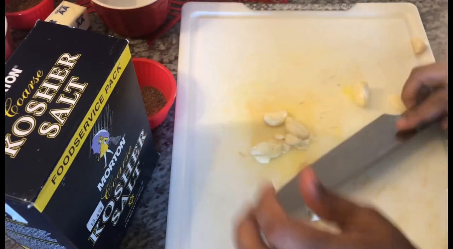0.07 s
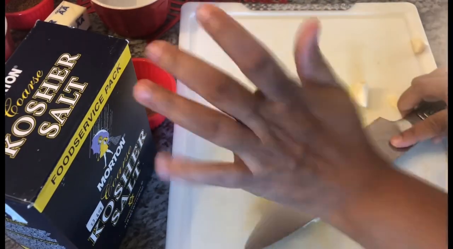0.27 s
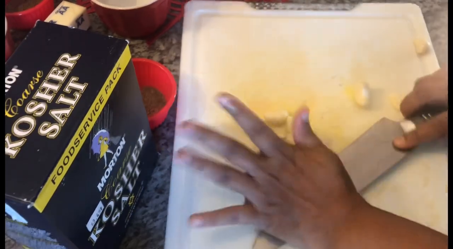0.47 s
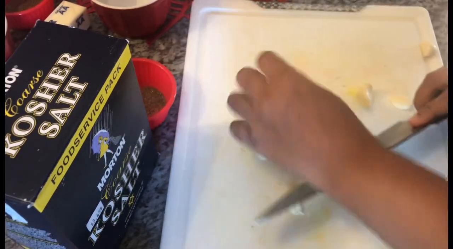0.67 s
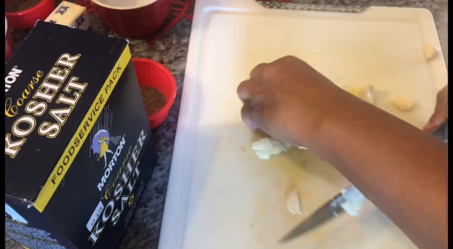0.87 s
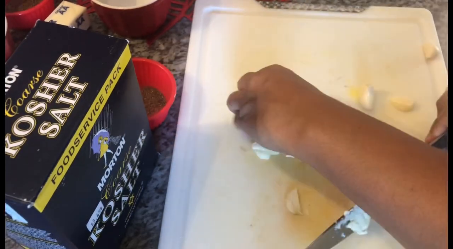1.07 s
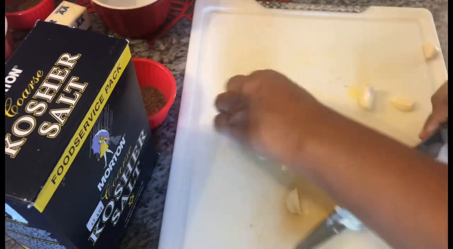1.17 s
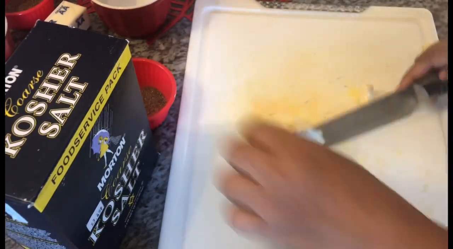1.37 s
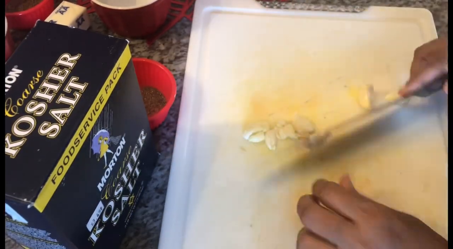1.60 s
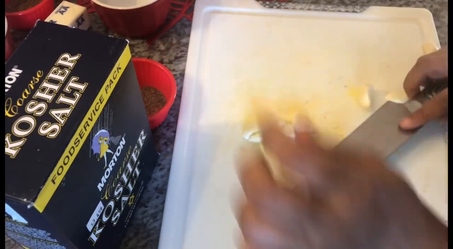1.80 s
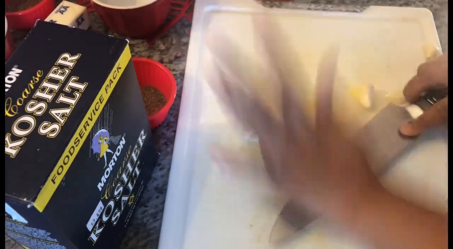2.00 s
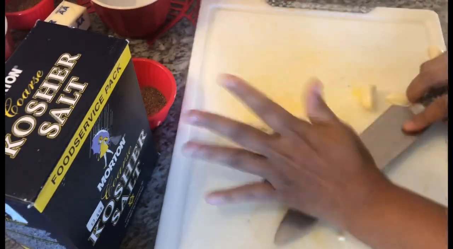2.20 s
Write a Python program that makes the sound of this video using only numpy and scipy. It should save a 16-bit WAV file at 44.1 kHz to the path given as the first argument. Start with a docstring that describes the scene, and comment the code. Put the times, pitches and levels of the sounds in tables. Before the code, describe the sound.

Two loud slaps on a knife blade crush garlic against a cutting board, each with a low thud. Between them come light knocks and a rasping, ringing scrape of steel, close by in a small, faintly humming kitchen.

```python
"""Two loud slaps, each with a boom: a palm hits the flat of a chef's knife to crush garlic on a plastic
board, and the counter shakes underneath. In between, the blade knocks on the board and is scraped clean,
rasping, then hissing and ringing as it comes free. Dry garlic skin ticks faintly.
The small kitchen echoes and has a low hum; a limiter (a fast volume control) squashes both slaps."""
import sys
import numpy as np
from scipy import signal
from scipy.fft import rfft, irfft
from scipy.io import wavfile
from scipy.ndimage import uniform_filter1d, minimum_filter1d

SR = 44100
rng = np.random.default_rng(int(sys.argv[2]) if len(sys.argv) > 2 else 0)


def bounce(signal):
    """Save signal as a 16-bit WAV file at the path given by the first command-line argument."""
    frames = np.transpose(np.atleast_2d(signal))
    limited = np.clip(frames, -1, 1)
    pcm = np.round(limited * 32767).astype(np.int16)
    wavfile.write(sys.argv[1], SR, pcm)


N = 99225
T = np.arange(N) / SR
SHORT = T[:8192]  # time axis for brief sounds
IMPULSE = SHORT == 0  # one instant push


def slaps():
    """Palm, blade and clove collide several times within each slap."""
    # the collisions (time [s], level [dB], brightness [Hz], fade time [s], board ring [Hz])
    hits = [(.2286, -20.5, 8970, 0.0034, 1027), (.2299, -8.5, 9500, 0.014, 1074),
            (.2320, -5.5, 4500, 0.017, 1480), (.2339, 6, 4800, 0.013, 1080), (.2373, 1, 2200, 0.011, 1250),
            (.2505, -14, 1840, .008, 1078), (1.9144, -22.5, 7700, 0.016, 1240),
            (1.9158, -4, 7330, 0.011, 1148), (1.9186, -9, 2340, 0.004, 1128),
            (1.9199, -8.5, 7510, 0.0083, 1179)]
    # tone of the crack (frequency [Hz], level [dB])
    colour = [(60, -40), (300, -15.5), (700, -13), (1200, -1), (2200, -1.5), (3200, -1), (5200, 0.5),
              (7000, -5), (9500, -1), (15500, 1.5)]
    return blows(hits, colour, ring_db=-7, ring_t60=0.027, grit=3.6)


def thuds():
    """The weight of the hand lands: the counter booms and the board shudders on it."""
    # the landings (time [s], level [dB])
    landings = [(.234, -31.5), (0.2488, -20.5), (1.921, -45), (1.931, -24.5)]
    # the counter's own notes (pitch [Hz], level [dB], fade time [s])
    counter_modes = [(56.6, -17, .4), (96, -0.5, 0.25), (118.6, -7, 0.29), (145.7, -5.5, 0.16),
                     (213.2, -14, 0.34), (265, -12.5, 0.1), (381, -21, 0.22), (475, -15, 0.3),
                     (620, -11.5, .3)]
    # tone of the shuddering board (frequency [Hz], level [dB])
    rattle_colour = [(30, -14.5), (90, 10), (200, -8.5), (400, -4.5), (700, -4), (1500, -36), (5000, -60)]
    push_s, rattle_db = .0015, -4
    notes = sum(amp(db) * mode(hz, t60, T) for hz, db, t60 in counter_modes)
    boom = soften(notes, 1 / push_s)  # a slower push gives a duller boom
    out = np.zeros(N)
    for s, db in landings:
        shudder = through(noise(), body(rattle_colour)) * fade(t60=.28)
        add(out, s, amp(db) * (boom + amp(rattle_db) * shudder))
    return thin(out, 32)


def knocks():
    """Knife and fingers knock lightly on the board."""
    # the knocks (time [s], level [dB], brightness [Hz], fade time [s], board ring [Hz])
    hits = [(.8612, -34.5, 890, 0.013, 620), (.864, -32, 350, .012, 316), (.9706, -10, 1820, .004, 1158),
            (.9722, -30, 600, 0.0054, 780), (.9742, -20.5, 1310, .004, 1070),
            (1.4222, -26.5, 2200, .004, 1120), (1.4238, -37, 1987, .004, 1780),
            (1.4255, -41, 2500, .004, 1130)]
    # tone of a knock (frequency [Hz], level [dB])
    colour = [(60, -60), (200, -30), (350, -1.5), (700, 6), (1200, 15.5), (1700, 13), (2000, 7), (3400, 8),
              (4500, -16), (15000, -11)]
    return blows(hits, colour, ring_db=4, ring_t60=0.035, grit=0.91)


def blows(hits, colour, ring_db, ring_t60, grit):
    """Each hit is a push and a gritty burst with its own brightness; the board rings briefly."""
    out, response = np.zeros(N), body(colour)
    strength = np.sqrt(.002 * SR)  # at 0 dB: the energy of 2 ms at full level
    for s, db, bright_hz, t60, ring_hz in hits:
        contact = soften(through(IMPULSE + grit * burst(t60), response), bright_hz)
        ring = soften(mode(ring_hz, ring_t60), 2 * ring_hz)
        ring = unit(thin(ring, ring_hz / 2))
        add(out, s, amp(db) * strength * unit(unit(contact) + amp(ring_db) * ring))
    return out


def burst(t60):
    """A crush of tiny contacts that dies away, equally strong from low to high."""
    spectrum = rfft(rng.standard_normal(len(SHORT)) * fade(t60, SHORT))
    even = spectrum / np.sqrt(uniform_filter1d(np.abs(spectrum) ** 2, size=100))
    return unit(irfft(even) * fade(4 * t60, SHORT))


def scrape():
    """Many tiny, uneven slips rasp on the board, then brighten and set the steel ringing."""
    # the stroke (time [s], board level [dB], blade level [dB], brightness [Hz])
    stroke = [(.985, -92, -68, 4000), (1.022, -52, -58, 9550), (1.04, -44, -57.5, 5000),
              (1.096, -32.5, -34.5, 4340), (1.148, -30, -24.5, 7560), (1.17, -34.5, -31.5, 9600),
              (1.205, -40, -30.5, 8300), (1.254, -69, -36, 10000), (1.298, -49, -48.5, 9700),
              (1.341, -80, -59, 8000)]
    # tone of the board's rasp (frequency [Hz], level [dB])
    rasp_colour = [(100, -37), (450, -27.5), (620, -5.5), (800, -11), (1000, -7.5), (1150, 6.5), (1400, -5),
                   (2200, -6.5), (4000, -21), (12000, -32)]
    # tone of the blade's hiss (frequency [Hz], level [dB])
    hiss_colour = [(300, -24), (700, -21), (1200, -13), (2200, 3), (2700, -3), (3300, 1.5), (4100, -6.5),
                   (5000, 3), (6700, -5.5), (8500, -6), (12000, -2.5), (15500, -2.5)]
    slips_per_s, spread_db, chatter_db = 2500, 2.5, 1
    times, board_db, blade_db, bright_hz = np.array(stroke).T
    board_level = amp(np.interp(T, times, board_db, left=-120, right=-120))
    blade_level = amp(np.interp(T, times, blade_db, left=-120, right=-120))
    sizes = amp(spread_db * np.minimum(rng.exponential(size=N), 5))
    slipping = rng.random(N) < slips_per_s / SR
    slips = unit(slipping * sizes * np.sign(noise())) * np.sqrt(N)
    chatter = amp(chatter_db * wander(per_s=300))  # the edge catches and lets go
    slips = thin(slips * chatter, 360)
    # blend from each row's brightness into the next
    blends = (np.interp(T, times, row) for row in np.eye(len(times)))
    edge = blade_level * sum(blend * soften(slips, hz) for blend, hz in zip(blends, bright_hz))
    hiss_response = unit(through(body(hiss_colour), IMPULSE + 1.06 * fine_modes(count=90)))
    rasp = through(slips * board_level, body(rasp_colour))
    hiss = through(edge, hiss_response)
    return rasp + amp(0.5) * hiss + amp(-0.5) * blade_ring(edge)


def blade_ring(drive):
    """Each note of the blade swells and fades as the contact moves along the edge."""
    # the blade's own notes (pitch [Hz], level [dB], fade time [s])
    blade_modes = [(1107, -8.5, .15), (2113, -3.5, .3), (3040, -6.5, 0.33), (3515, -5, .2),
                   (3845, -2, 0.16), (4220, -11.5, 0.26), (4829, -0.5, 0.63), (4750, -7, 0.26),
                   (5535, -9.5, 0.25), (5738, 3.5, 0.3), (6730, -1, .1), (6660, -12.5, 0.087),
                   (7470, -2.5, 0.057), (7710, -4, 0.049), (8520, -4, .08), (9808, -21, 0.066),
                   (10160, 0.5, 0.04), (12560, -7, .05), (13770, 0, .05), (15200, 0, .03)]
    shimmer_db = 2.5
    out = np.zeros(N)
    for hz, db, t60 in blade_modes:
        shimmer = amp(shimmer_db * wander(per_s=45))
        out += amp(db) * through(drive * shimmer, unit(mode(hz, t60)))
    return out / np.sqrt(sum(amp(db) ** 2 for _, db, _ in blade_modes))


def fine_modes(count):
    """The blade's many weaker, short notes, scattered from mid to very high pitch."""
    pitches = 500 + 15300 * (np.arange(count) + rng.random(count)) / count
    return unit(sum((-1) ** k * unit(mode(hz, t60=0.047)) for k, hz in enumerate(pitches)))


def skin_ticks():
    """Dry garlic skin ticks faintly."""
    # the ticks (time [s], level [dB])
    ticks = [(.066, -53.5), (0.207, -51.5), (1.716, -59), (1.726, -50.5), (1.896, -50.5), (2.150, -56.5)]
    # tone of the skin (frequency [Hz], level [dB])
    colour = [(500, -24.5), (2000, -4), (4500, 0), (8000, -7.5), (15000, -12.5)]
    return puffs(ticks, colour, t60=0.035)


def steel_clicks():
    """The steel touches down with small, dry clicks."""
    # the clicks (time [s], level [dB])
    clicks = [(.6935, -45.5), (.8602, -44), (.893, -48), (1.4222, -40.5), (1.4262, -45)]
    # tone of a click (frequency [Hz], level [dB])
    colour = [(500, -22), (1500, -8), (2200, 1), (3000, -1), (4200, -5), (6000, -14), (14000, -28)]
    return puffs(clicks, colour, t60=0.012)


def puffs(events, colour, t60):
    """Short puffs of noise that share one tone."""
    out = np.zeros(N)
    for s, db in events:
        add(out, s, amp(db) * noise() * fade(t60))
    return through(out, body(colour))


def kitchen(x):
    """Adds quick echoes from counter and cupboards, then a tail whose highs die first."""
    # how long the room rings (frequency [Hz], fade time [s])
    room_fades = [(100, 0.73), (500, .45), (1400, 0.47), (3000, 0.4), (6000, 0.34), (10000, .29),
                  (15000, 0.25)]
    tail_db, build_s, early_db = -14.5, 0.0092, -19
    freqs = np.fft.rfftfreq(2 * N, 1 / SR)
    centres = np.log([hz for hz, _ in room_fades])
    spectrum, tail = rfft(rng.standard_normal(2 * N)), 0
    for row, (_, t60) in zip(np.eye(len(centres)), room_fades):
        band = np.interp(np.log(freqs + 1), centres, row)
        tail = tail + irfft(spectrum * band)[:N] * fade(t60)
    tail = unit(tail * (1 - np.exp(-(T / build_s) ** 2)))
    early = unit(noise() * fade(t60=.06) * (T > .002))
    return x + through(x, amp(tail_db) * tail + amp(early_db) * early)


def background():
    """The room's low, steady hum, and a faint wash of noise that fades from the start."""
    # tone of the hum (frequency [Hz], level [dB])
    hum_colour = [(15, -56.5), (25, -23.5), (114, 1.5), (249, -6), (427, -10), (560, -10), (734, -7.5),
                  (1260, -13.5), (2110, -23), (2410, -25.5), (3080, -32), (3720, -27), (4250, -34),
                  (10700, -41), (16000, -49.5)]
    # tone of the wash (frequency [Hz], level [dB])
    wash_colour = [(300, -22), (1200, -0.5), (2500, 3.5), (4200, -3.5), (6500, -16.5), (15000, -34)]
    hum, wash = (signal.fftconvolve(rng.standard_normal(2 * N), body(colour))[N:2 * N]
                 for colour in (hum_colour, wash_colour))
    return amp(-52) * hum + amp(-56.5) * wash * fade(t60=2.2)


def amp(db):
    """Turns decibels into a multiplier."""
    return 10 ** (np.asarray(db) / 20)


def unit(x):
    """Scales x to an energy of 1."""
    return x / np.sqrt(np.sum(x ** 2))


def fade(t60, t=T):
    """Dies away from 1; t60 is the fade time, the seconds it takes to drop 60 dB."""
    return np.exp(-np.minimum(np.log(1000) * t / t60, 60))


def mode(hz, t60, t=SHORT):
    """One note of a struck object: a fading sine wave."""
    return np.sin(2 * np.pi * hz * t) * fade(t60, t)


def noise():
    """White noise."""
    return rng.standard_normal(N)


def wander(per_s):
    """Drifts between random values, mostly within -1 to 1."""
    return np.interp(T * per_s, np.arange(1000), rng.standard_normal(1000))


def body(colour):
    """How an object with this tone, given as (Hz, dB) points, responds to one tap."""
    n = len(SHORT)
    hz, db = np.array(colour, float).T
    freqs = np.maximum(np.fft.rfftfreq(2 * n, 1 / SR), 1)
    gains = amp(np.interp(np.log(freqs), np.log(hz), db))
    cepstrum = irfft(np.log(gains))
    cepstrum[1:n] *= 2  # folded forward, so nothing sounds before the tap
    cepstrum[n:] = 0
    return unit(irfft(np.exp(rfft(cepstrum)))[:n])


def through(x, response):
    """Plays x through an object or room, given its response to one tap."""
    return signal.oaconvolve(x, response)[:len(x)]


def soften(x, hz):
    """Turns down the highs above hz."""
    return signal.sosfilt(signal.butter(2, hz, fs=SR, output="sos"), x + 1e-18)


def thin(x, hz):
    """Turns down the lows below hz."""
    return signal.sosfilt(signal.butter(2, hz, "high", fs=SR, output="sos"), x + 1e-18)


def add(out, s, x):
    """Mixes x in at s seconds."""
    i = int(s * SR)
    out[i:i + len(x)] += x[:N - i]


def scene():
    """All the sounds on the board, heard in the kitchen, on one channel."""
    board = slaps() + knocks() + skin_ticks() + steel_clicks() + thuds() + scrape()
    return (kitchen(board) + background())[None]


def record(dry):
    """A limiter turns the loudest peaks down and quickly lets go; the very highest sound is cut."""
    ceiling, release_s, top_hz = .88, .007, 15800
    excess = np.log(np.maximum(np.abs(dry[0]) / ceiling, 1))
    held = np.maximum.accumulate(excess + T / release_s) - T / release_s
    gain = uniform_filter1d(minimum_filter1d(np.exp(-held), size=25), size=25)
    return signal.sosfilt(signal.ellip(10, .2, 80, top_hz, fs=SR, output="sos"), dry * gain)


dry = scene()
out = record(dry)
bounce(out)
```